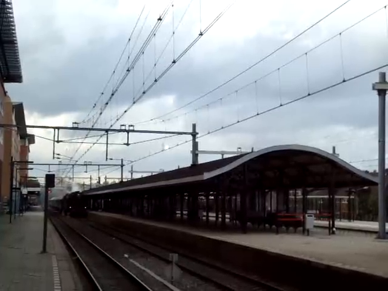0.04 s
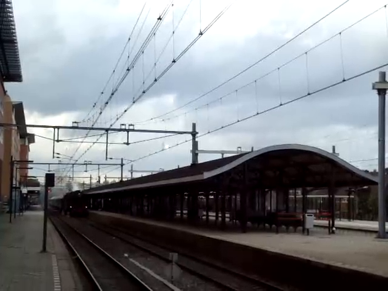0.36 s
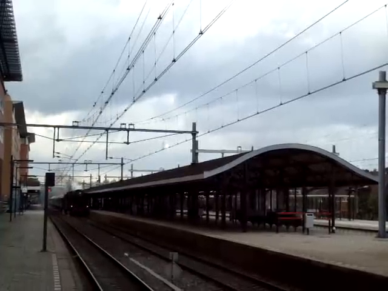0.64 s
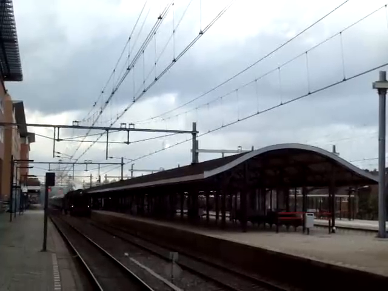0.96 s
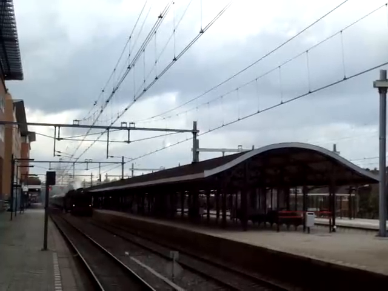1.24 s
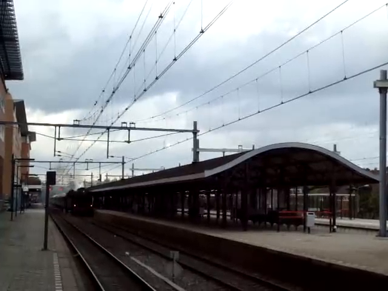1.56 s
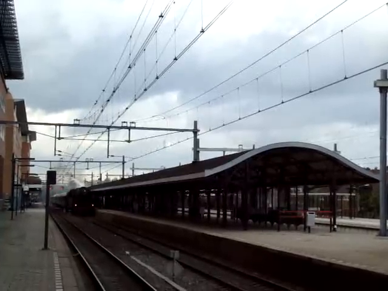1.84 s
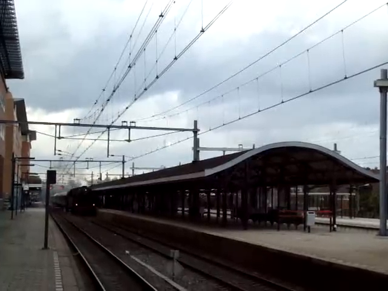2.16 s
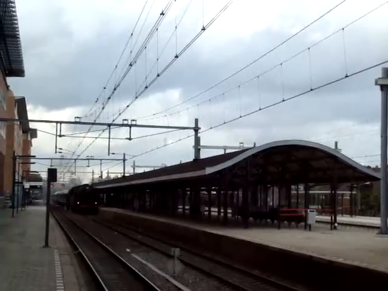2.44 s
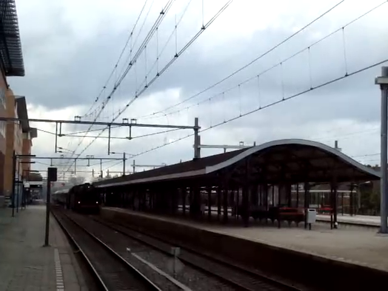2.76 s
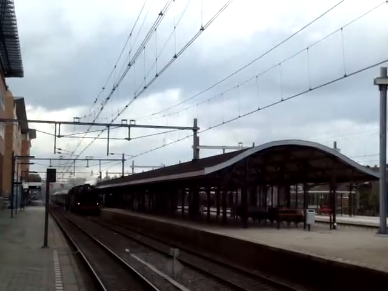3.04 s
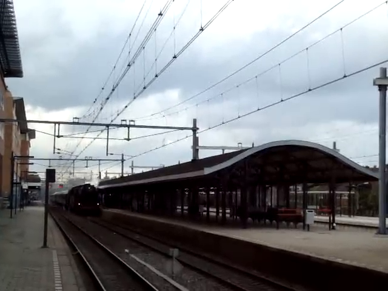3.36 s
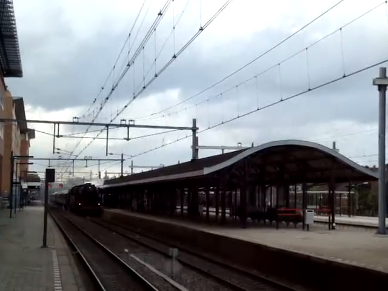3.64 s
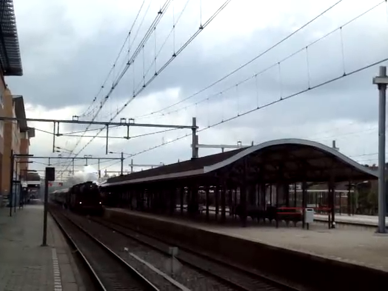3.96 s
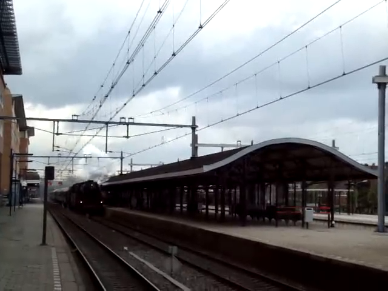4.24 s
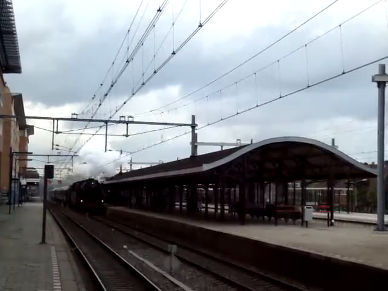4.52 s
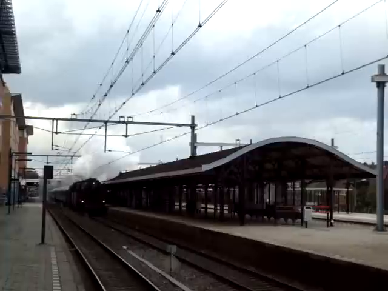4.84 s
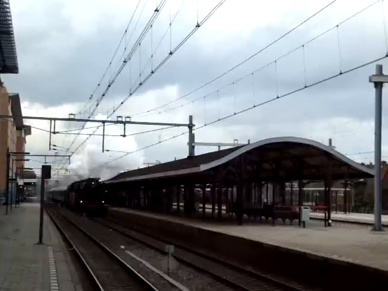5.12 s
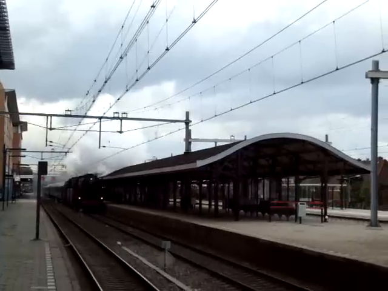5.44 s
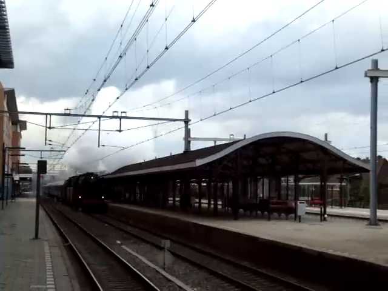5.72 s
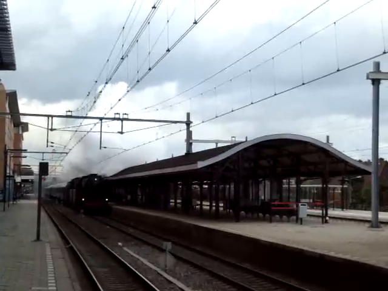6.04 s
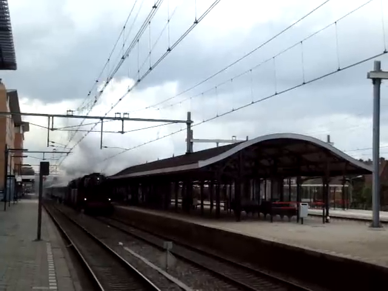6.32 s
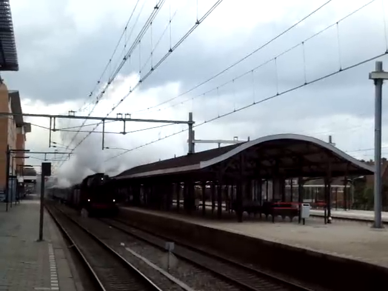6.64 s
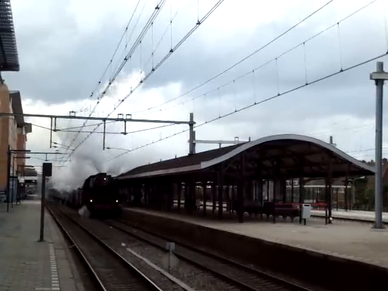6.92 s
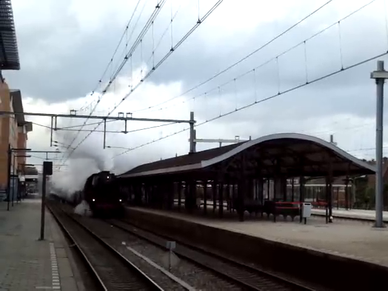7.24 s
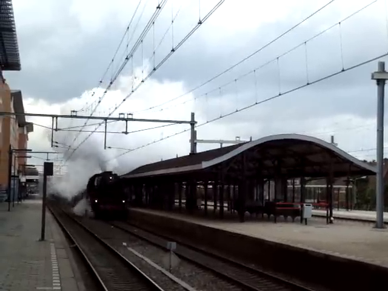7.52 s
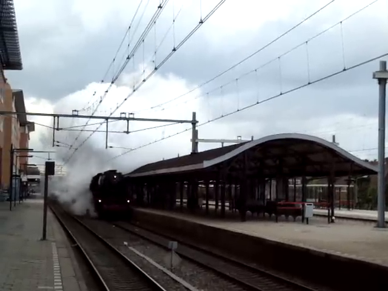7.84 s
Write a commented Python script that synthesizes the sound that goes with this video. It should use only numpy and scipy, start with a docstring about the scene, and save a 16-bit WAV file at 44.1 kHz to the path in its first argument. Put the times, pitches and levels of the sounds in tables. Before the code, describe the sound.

A steam locomotive coasts towards an open station with a quiet, distant rumble and a thin, steady whine, slowly growing. After one tiny tick, its safety valve pops with a dull thud and a loud jet of steam roars for nearly four seconds, piercing at first, wavering, then easing. A small mono microphone briefly overloads and turns its level down.

```python
"""A distant rumble and a thin, steady whine: a steam locomotive coasts towards an open station.
After one tiny tick its safety valve pops with a dull thud, and a turbulent jet of steam roars for
nearly four seconds, wavering in the wind, then eases. The ringing valve seat makes the start piercing.
A small mono camera overloads at the pop and turns its gain down."""
import sys
import numpy as np
from scipy import signal
from scipy.fft import rfft, irfft, next_fast_len
from scipy.io import wavfile
from scipy.ndimage import uniform_filter1d

SR = 44100
rng = np.random.default_rng(int(sys.argv[2]) if len(sys.argv) > 2 else 0)


def wav_out(sig):
    """Save sig, one row per channel (or a flat mono array), as 16-bit PCM at SR to the path in sys.argv[1]."""
    wavfile.write(sys.argv[1], SR, np.round(np.clip(np.atleast_2d(sig).T, -1, 1) * 32767).astype(np.int16))


N = 356328

POP_S, POP_RISE_S = 4.2855, 0.0014   # when the valve snaps open, and how fast


def from_db(db):
    """Decibels to gain."""
    return 10 ** (np.asarray(db) / 20)


def seconds():
    """The time of every sample."""
    return np.arange(N) / SR


def rms_one(x):
    """Scale to rms 1."""
    return x / np.sqrt(np.mean(x ** 2) + 1e-20)


def envelopes(rows):
    """Breakpoint rows (time first) as one envelope for each further column."""
    times_s, *columns = np.transpose(rows)
    return [np.interp(seconds(), times_s, column) for column in columns]


def band(x, low_hz, high_hz):
    """Gentle band-pass."""
    sos = signal.butter(2, [low_hz, min(high_hz, SR * .45)], "band", fs=SR, output="sos")
    return signal.sosfilt(sos, x)


def drift(rate_hz):
    """Slow random modulation, rms 1: control-rate noise smoothed twice."""
    hop, warm_up = 40, 2000
    pole = np.exp(-2 * np.pi * rate_hz * hop / SR)
    noise = rng.standard_normal(N // hop + warm_up + 2)
    slow = signal.lfilter([1], [1, -2 * pole, pole * pole], noise)[warm_up:]
    return np.interp(np.arange(N) / hop, np.arange(len(slow)), rms_one(slow))


def noisy_tone(hz, width_hz):
    """A resonance driven by turbulence: a tone of wandering strength and phase, rms 1."""
    phase = 2 * np.pi * np.cumsum(hz * np.ones(N)) / SR
    return rms_one(drift(width_hz) * np.cos(phase) + drift(width_hz) * np.sin(phase))


def coloured(colour):
    """Two unrelated noises of rms 1 with the given spectrum."""
    size = next_fast_len(N)
    colour_hz, colour_db = np.transpose(colour)
    hz = np.maximum(np.arange(size // 2 + 1) * SR / size, 1)
    gains = from_db(np.interp(np.log(hz), np.log(colour_hz), colour_db))
    white = rng.standard_normal((2, size))
    return rms_one(irfft(rfft(white) * gains, size)[:, :N])


def turbulence(colour, swells_db, anchors_hz, flicker_db, flicker_hz):
    """Coloured noise in half-octave bands; each follows the nearest swells and flickers on its own."""
    edges_hz = 28 * 2 ** (np.arange(19) / 2)
    noise, out = coloured(colour), 0
    for k, (low, high) in enumerate(zip(edges_hz, edges_hz[1:])):
        log_centre = np.log(low * high) / 2
        shares = np.array([np.interp(log_centre, np.log(anchors_hz), row) for row in np.eye(len(swells_db))])
        level_db = shares @ swells_db + flicker_db * drift(flicker_hz)
        out = out + from_db(level_db) * band(noise[k % 2], low, high)
    return out


def station(x, echo_db, wander_s, count=5):
    """Weak echoes off ground, roof and walls; wind and motion shift their paths, so the hiss phases."""
    out = x
    for delay_s in rng.uniform(0.002, .012, count):
        path_s = delay_s + wander_s * drift(.6)
        out = out + from_db(echo_db) * np.interp(seconds() - path_s, seconds(), x)
    return out / np.sqrt(1 + count * from_db(echo_db) ** 2)


def approach(rumble_db, rush_db, leak_db):
    """Level curves of the nearing train: they change ever faster and pass the given dB at the pop."""
    nearness = (seconds() / POP_S) ** 1.9
    return np.outer([rumble_db, rush_db, leak_db], nearness)


def train(rolling_db):
    """The bed: a steady rumble and singing engine tones, with wheel rush and leaking steam creeping up."""
    # spectrum of the rolling train: frequency_hz, relative_db
    train_colour = [(30, -34), (42, -22), (60, -11.5), (140, -6), (240, -3.5), (420, 1.5), (760, -2),
                    (1000, 0), (1350, -1), (1900, -5), (2600, -9.5), (3600, -11.5), (5000, -18),
                    (9700, -31.5)]
    # tones the engine sings while far off: pitch_hz, width_hz, level_db
    engine_tones = [(261, 9.3, -59.5), (450, 12, -54), (1545, 16, -53)]
    growth_db = approach(rumble_db=-0.4, rush_db=6.5, leak_db=6.5)
    rolling = turbulence(train_colour, growth_db, [400, 1200, 4000], flicker_db=0.88, flicker_hz=8)
    rumble_db, rush_db, _ = growth_db
    out = from_db(rolling_db) * rolling
    for pitch_hz, width_hz, level_db in engine_tones:
        swell_db = rumble_db if pitch_hz < 700 else rush_db
        out += from_db(level_db + swell_db) * noisy_tone(pitch_hz, width_hz)
    return out


def tick(at_s, peak_db, decay_s):
    """One tiny sharp click close to the microphone."""
    age = seconds() - at_s
    burst = rng.standard_normal(N) * (age > 0) * np.exp(-abs(age) / decay_s)
    snap = band(band(burst + 1e-18, 3800, 6600), 3900, 12000)
    return from_db(peak_db) * snap / np.max(abs(snap))


def pop(thud_db, decay_s):
    """The first gust of steam lands with a dull thud."""
    age = np.maximum(seconds() - POP_S, 0)
    gust = np.minimum(age / POP_RISE_S, 1) * np.exp(-age / decay_s)
    return gust * from_db(thud_db) * rms_one(band(rng.standard_normal(N), 190, 930))


def hollow_notes(width_hz):
    """Hollow, breathy notes glide inside the roar, each swelling and fading in a rounded arch."""
    # notes in the jet: start_s, length_s, first_hz, last_hz, level_db (relative to the jet)
    notes = [(4.82, 0.52, 555, 696, -18.5), (6.25, 1.55, 575, 426.2, -23)]
    out = 0
    for start_s, length_s, first_hz, last_hz, level_db in notes:
        progress = np.clip((seconds() - start_s) / length_s, 0, 1)
        arch = 2 * np.sqrt(progress * (1 - progress))
        pitch_hz = first_hz * (last_hz / first_hz) ** progress
        out = out + arch * from_db(level_db) * noisy_tone(pitch_hz, width_hz)
    return out


def seat_ring(relative_db, fall_db_per_s, ring_s):
    """A piercing edge on the jet: the valve seat rings until its gap grows too wide."""
    age = np.maximum(seconds() - POP_S, 0)
    narrow = np.exp(-(age / ring_s) ** 8)
    ring = rms_one(band(rng.standard_normal(N), 2840, 3540))
    return narrow * from_db(relative_db - fall_db_per_s * age) * ring


def flow(build_db, build_s, ease_at_s, ease_db, ease_s):
    """Envelope of the escaping steam: the valve snaps open, lifts fully, holds, then sinks back a little."""
    age = seconds() - POP_S
    is_open = np.clip(age / POP_RISE_S, 0, 1)
    building_db = build_db * np.clip(1 - age / build_s, 0, 1)
    easing_db = ease_db * (1 - np.exp(-np.maximum(seconds() - ease_at_s, 0) / ease_s))
    return is_open * from_db(-building_db - easing_db)


def safety_valve(gain_db, flutter_db, flutter_hz):
    """The main roar: a jet of steam with a hard attack, fluttering with eddies and wind."""
    # the jet wavering in the wind, each band taken about its mean: time_s, roar_db, core_db, hiss_db
    wavering = [(4.3, -22.5, -21.5, -21), (4.32, -23.5, -14.5, -17.5), (4.45, -27.5, -16, -22),
                (4.66, -27.5, -17.5, -23), (4.9, -23, -21, -30), (5.03, -20.5, -17.5, -26),
                (5.45, -25, -19, -22.5), (5.55, -23.5, -21, -27.5), (5.92, -22, -16.5, -25),
                (6.07, -24.5, -15.5, -23.5), (6.24, -21.5, -16, -24), (6.25, -23, -19, -23.5),
                (6.79, -21.5, -17.5, -25.5), (6.89, -22, -18.5, -23), (7.04, -23, -20, -26.5),
                (7.2, -19.5, -22, -24), (7.3, -22.5, -19.5, -23.5), (7.9, -25.5, -20.5, -22)]
    # spectrum of the jet: frequency_hz, relative_db
    jet_colour = [(100, -43.5), (165, -39), (240, -25.5), (370, -21), (620, -10.5), (870, -9), (1250, -1.5),
                  (1700, -1.5), (2200, .5), (3100, 0), (4200, -4), (5500, -9), (7800, -16.5), (9700, -28)]
    swells_db = np.array(envelopes(wavering)) - np.mean(wavering, axis=0)[1:, None]
    jet = turbulence(jet_colour, swells_db, [1450, 2600, 6000], flicker_db=0.9, flicker_hz=15)
    notes = hollow_notes(width_hz=37)
    ring = seat_ring(relative_db=-5.5, fall_db_per_s=11, ring_s=0.69)
    envelope = flow(build_db=15.5, build_s=0.24, ease_at_s=7.93, ease_db=11, ease_s=0.093)
    return envelope * from_db(gain_db + flutter_db * drift(flutter_hz)) * (jet + notes + ring)


def scene():
    """The locomotive in the station's reflections and the dry tick, all at one microphone."""
    blow_off = safety_valve(gain_db=7, flutter_db=0.31, flutter_hz=24)
    engine = train(rolling_db=-38) + blow_off + pop(thud_db=-23.5, decay_s=.04)
    mono = station(engine, echo_db=-23, wander_s=.0002)
    mono += tick(at_s=2.8402, peak_db=-19, decay_s=0.00072)
    return np.array([mono, mono])


def gain_control(x, ceiling_db, attack_s, release_db_per_s):
    """Loud sound ducks the gain quickly; it recovers very slowly."""
    power = np.abs(uniform_filter1d(x[0] ** 2, size=2048))
    excess_db = np.maximum(10 * np.log10(power + 1e-12) - ceiling_db, 0)
    recovery_db = release_db_per_s * seconds()
    held_db = np.maximum.accumulate(excess_db + recovery_db) - recovery_db
    pole = np.exp(-1 / (attack_s * SR))
    return x * from_db(-signal.lfilter([1 - pole], [1, -pole], held_db))


def record(dry):
    """The camera's sound: automatic gain, lopsided clipping on overload and a steep 10 kHz top cut."""
    levelled = gain_control(dry, ceiling_db=-14.5, attack_s=0.016, release_db_per_s=0.97)
    clipped = np.clip(levelled, -.68, .6)
    top_cut = signal.ellip(12, .1, 80, 10000, fs=SR, output="sos")
    return signal.sosfilt(top_cut, clipped)


dry = scene()
out = record(dry)
wav_out(out)
```